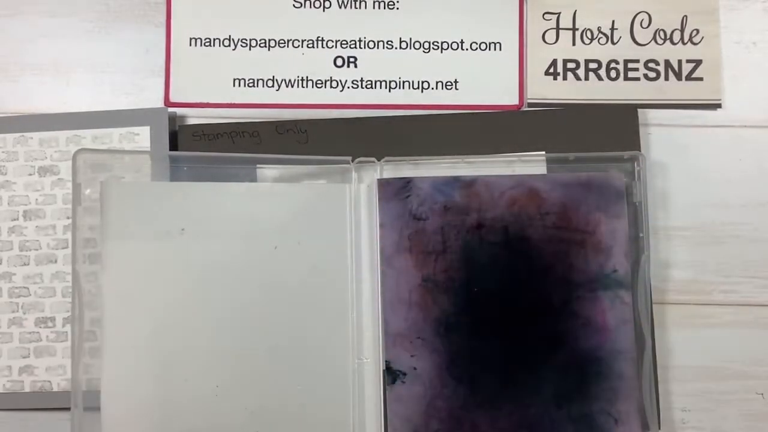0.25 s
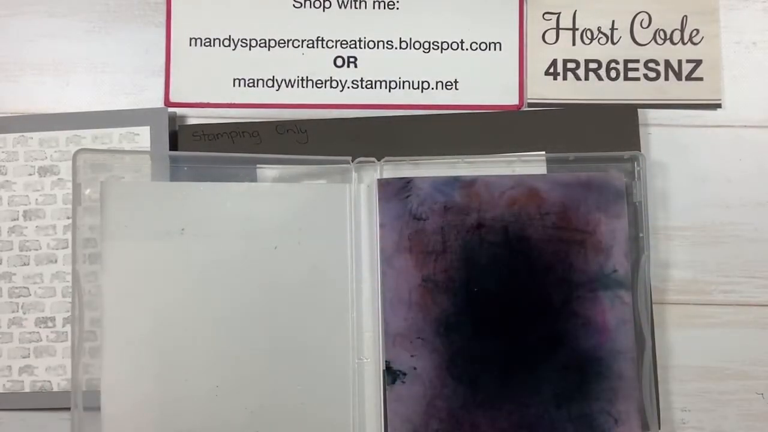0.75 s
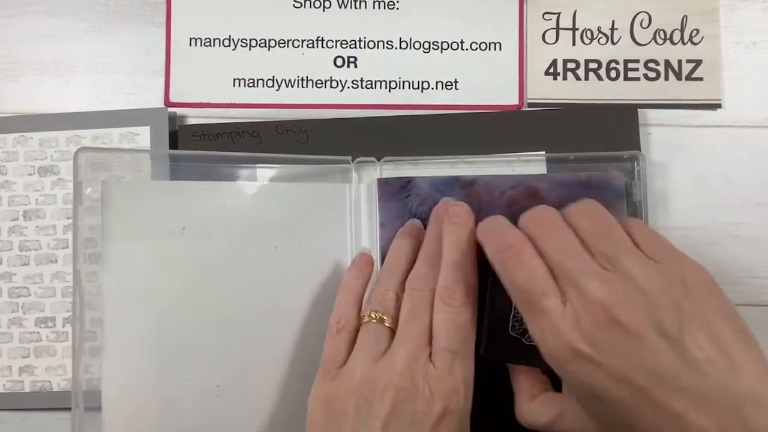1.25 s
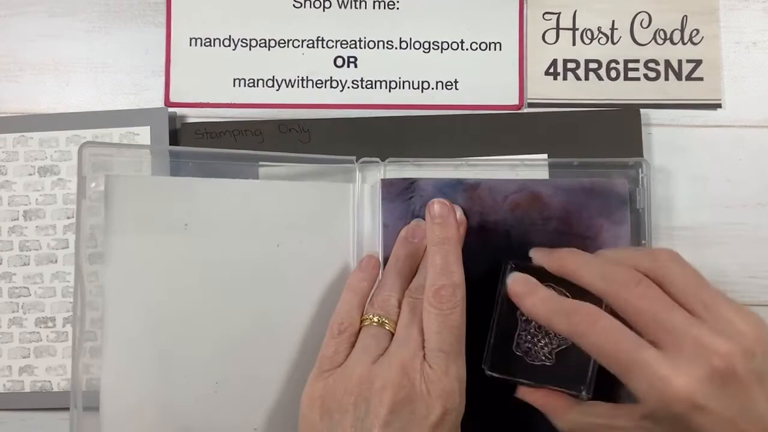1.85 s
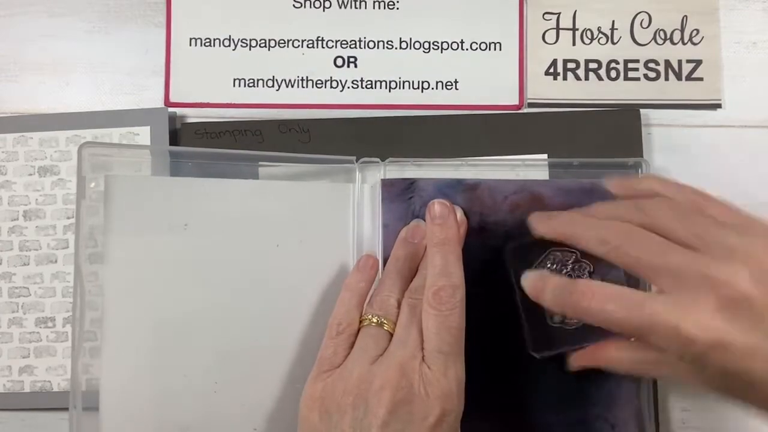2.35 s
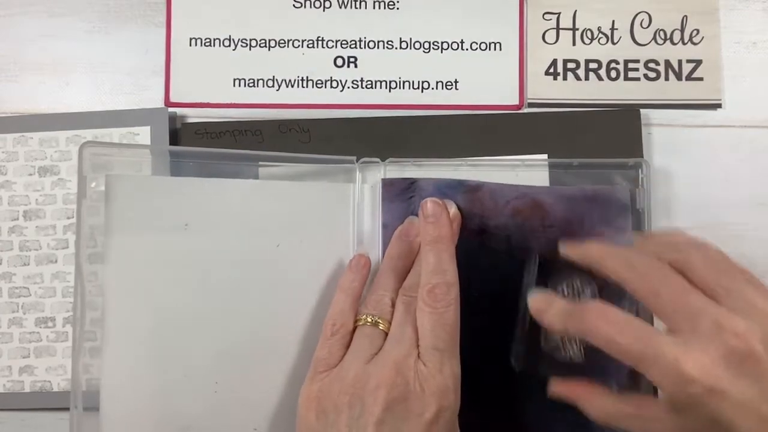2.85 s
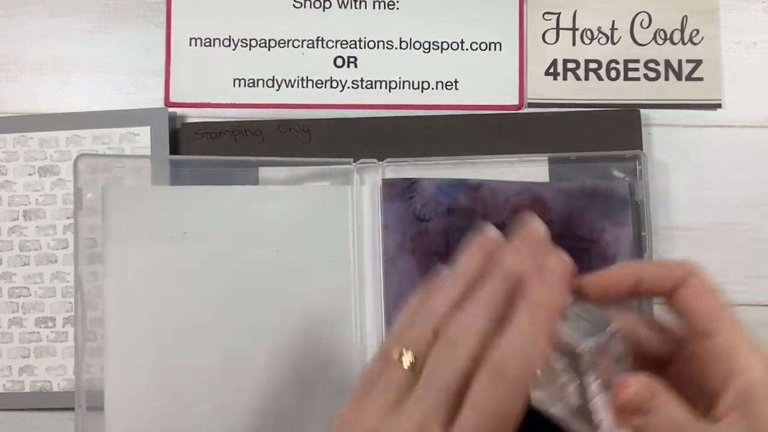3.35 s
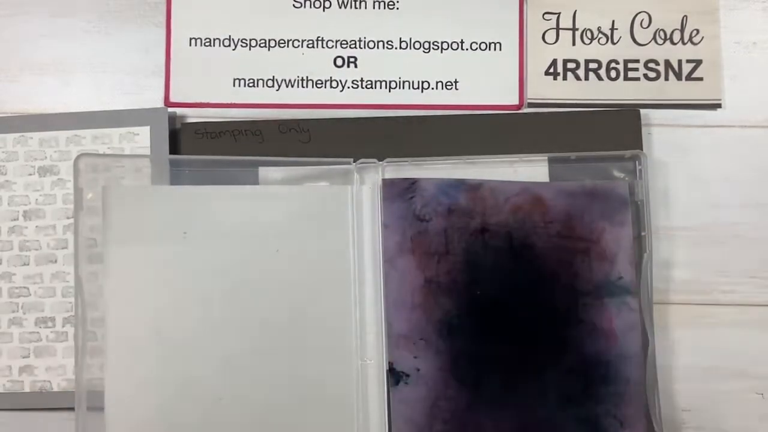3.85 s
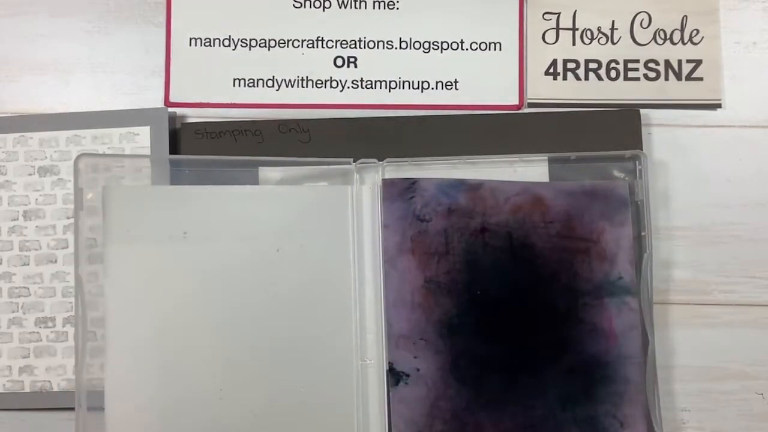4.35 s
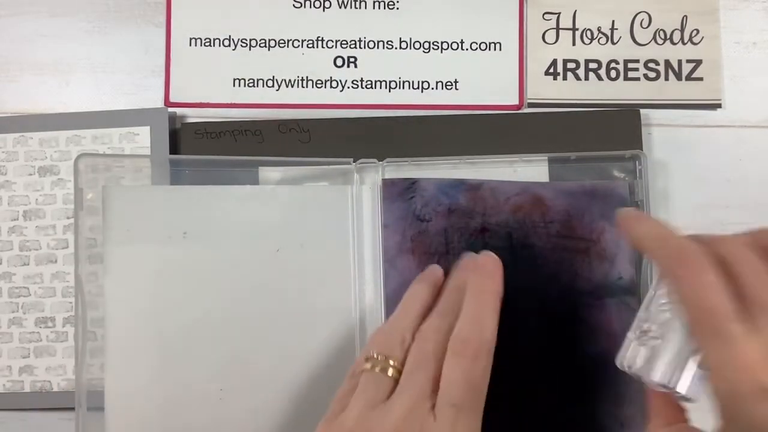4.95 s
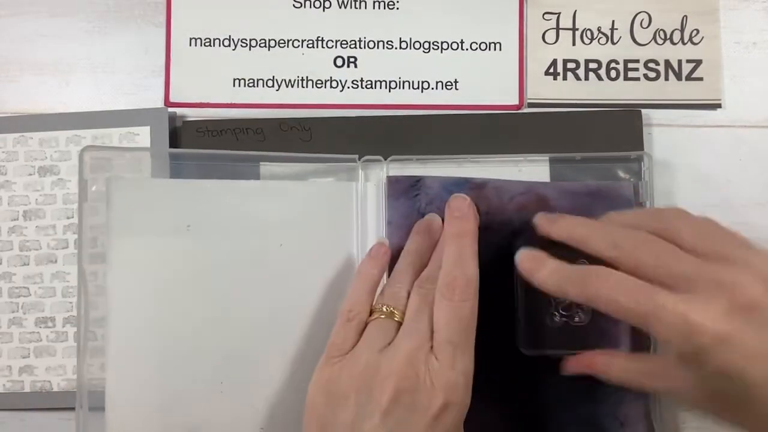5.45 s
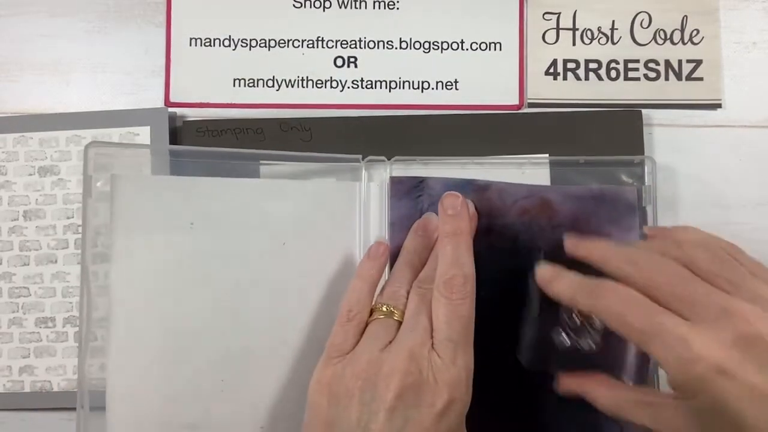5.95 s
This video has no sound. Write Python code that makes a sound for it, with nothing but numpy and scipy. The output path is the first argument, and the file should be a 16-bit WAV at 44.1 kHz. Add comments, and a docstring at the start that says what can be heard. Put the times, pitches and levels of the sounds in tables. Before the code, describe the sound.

In a small, faintly humming room, a nearby microphone picks up a hard plastic block knocking on a desk and settling flat. Soft, tacky squeaks and peeling sounds follow as a stamp is pressed repeatedly on an ink pad, with fingernail ticks and muffled creaking. After a low nudge of the case, a louder run of clacks ends in a thud, and more quiet, sticky dabs follow.

```python
"""A clear acrylic stamp block clacks edge-on onto a desk, drags and thuds flat; small quiet room, low hum.
From 0.9 s something creaks dully in slowing runs as the hands come and go.
From 1.4 s a block is dabbed on an ink pad: the tacky stamp squeaks by stick-slip and peels off with
sticky smacks; at 3 s the pad's case is nudged. At 4 s a block clacks down, shudders and drops flat.
From 5.3 s the dabbing resumes. Light ticks of nails and plastic and faint fizzy crackles fall between."""
import sys
import numpy as np
from scipy import signal
from scipy.fft import rfft, irfft
from scipy.io import wavfile
from scipy.ndimage import map_coordinates

SR = 44100
rng = np.random.default_rng(int(sys.argv[2]) if len(sys.argv) > 2 else 0)


def inscribe(sig):
    """Save sig as 16-bit PCM at rate SR to the path in sys.argv[1].

    A 1-D sig is mono; a 2-D sig holds one channel per row.
    Samples are clipped to [-1, 1] before scaling.
    """
    pcm = np.round(np.clip(np.atleast_2d(sig).T, -1, 1) * 32767)
    wavfile.write(sys.argv[1], SR, pcm.astype(np.int16))


N = 273111
AGE_S = np.arange(SR * 3 // 5) / SR   # time since event onset

# stamp resonances: (centre [Hz], width [Hz], lift [dB])
STAMP_RESONANCES = [(1136, 300, 5), (1660, 1100, 2.5), (2730, 350, 5), (3160, 510, 5.5), (4720, 530, 8)]
# spectrum of the tacky contact: (frequency [Hz], density [dB])
TACK_SPECTRUM = [(200, 9), (600, 14), (1200, 2.5), (2200, -3), (4000, -10), (5500, -19.5), (8000, -21),
                 (15000, -44)]


def from_db(db):
    """Decibels to gain."""
    return 10 ** (np.asarray(db) / 20)


def unit_rms(x):
    """Scale to rms 1."""
    return x / np.sqrt(np.mean(x ** 2) + 1e-20)


def at_hz(points, hz):
    """Interpolate a table over log frequency."""
    table_hz, value = np.transpose(points)
    return np.interp(np.log(np.maximum(hz, 1)), np.log(table_hz), value)


def decay(t60_s, age_s=AGE_S):
    """Envelope falling 60 dB in t60_s."""
    return np.exp(-np.log(1000) * age_s / t60_s)


def rise(build_s, age_s=AGE_S):
    """Exponential onset."""
    return 1 - np.exp(-age_s / build_s)


def swell(half_s, squareness):
    """Time from the peak and a bell envelope; higher squareness gives steeper flanks."""
    t = AGE_S[:12288] - AGE_S[:12288].mean()
    return t, np.exp(-np.abs(t / half_s) ** squareness)


def add(track, time_s, sound):
    """Mix a sound in at time_s."""
    at = int(round(time_s * SR))
    first, last = max(at, 0), min(at + len(sound), len(track))
    track[first:last] += sound[first - at:last - at]


def butter(x, hz, kind, order=2):
    """Causal Butterworth filter."""
    sos = signal.butter(order, np.clip(hz, 10, .45 * SR), kind, fs=SR, output="sos")
    return signal.sosfilt(sos, x + 1e-18)


def noise(spectrum, size, resonances=()):
    """Shaped noise with resonant peaks, rms 1."""
    hz = np.arange(size // 2 + 1) * SR / size
    peaks_db = sum(db / (1 + (2 * (hz - centre) / width) ** 2) for centre, width, db in resonances)
    gain = from_db(at_hz(spectrum, hz) + peaks_db)
    return unit_rms(irfft(rfft(rng.standard_normal(size)) * gain, size))


def drift(rate_hz, size, knots=4096):
    """Smooth random curve, spread about 1."""
    steps = np.arange(size) * rate_hz / SR
    return np.interp(steps, np.arange(knots), rng.standard_normal(knots))


def ring(modes, spread_db, size=len(AGE_S)):
    """Struck modes; each blow shares its force among them differently."""
    t = AGE_S[:size]
    out = np.zeros(size)
    for k, (hz, db, t60_s) in enumerate(modes):
        gain = (-1) ** k * from_db(db + spread_db * rng.standard_normal())
        out += gain * np.sin(2 * np.pi * hz * t) * decay(t60_s, t)
    return out


def dense_ring(spectrum, envelope, size):
    """Close modes as third-octave noise bands, each with its own envelope; energy 1."""
    centres_hz = 63 * 2 ** (np.arange(25)[:, None] / 3)
    hz = np.maximum(np.arange(size // 2 + 1) * SR / size, 1)
    shares = np.maximum(1 - 3 * np.abs(np.log2(hz / centres_hz)), 0)
    bands = irfft(rfft(rng.standard_normal(size)) * shares, size) * envelope(centres_hz, AGE_S[:size])
    energies = np.sum(bands ** 2, axis=1, keepdims=True)
    gains = np.sqrt(centres_hz / energies) * from_db(at_hz(spectrum, centres_hz))
    out = np.sum(bands * gains, axis=0)
    return out / np.sqrt(np.sum(out ** 2))


def rasp(half_s, hz, spectrum, band_ratio, squareness, grain_db=2, resonances=(), glide_oct=0):
    """Clumped tiny snaps in a broad band: start offset from the peak [s], sound (rms 1 at the peak)."""
    t, envelope = swell(half_s, squareness)
    read_position = np.cumsum(2 ** (glide_oct * np.clip(t / half_s, -2, 2)))
    gliding = map_coordinates(noise(spectrum, len(t), resonances), [read_position], mode="wrap")
    snaps = gliding * from_db(grain_db * drift(800, len(t)))
    sound = envelope * butter(snaps, [hz / band_ratio, hz * band_ratio], "band", order=3)
    return t[0], sound * np.sqrt(np.sum(envelope ** 2) / np.sum(sound ** 2))


def background(air_db=-62, waver_db=5, wander_hz=4.6):
    """Dull room air and a wavering hum."""
    # room air: (frequency [Hz], density [dB])
    air_spectrum = [(20, -26.5), (40, -3), (62, -3), (90, -2), (130, -3.5), (180, -12.5), (270, -10.5),
                    (450, -14.5), (650, -22), (1000, -30), (2000, -38.5), (5000, -42.5), (13000, -49),
                    (15500, -56)]
    # hum partials: (frequency [Hz], level [dB])
    partials = [(64.6, -70), (129.2, -69), (344.5, -77.5), (441.4, -78.5)]
    out = from_db(air_db) * noise(air_spectrum, N)
    for hz, db in partials:
        phase = 2 * np.pi * np.cumsum(hz + wander_hz * drift(6.5, N)) / SR
        out += from_db(db + waver_db * drift(12, N)) * np.sqrt(2) * np.sin(phase)
    return out


def rubs(drag_peak_s=.19, drag_db=-46.5, ring_peak_s=.245):
    """Skin and block hiss over plastic or paper; an edge dragged on the desk scrapes and rings."""
    # brushing strokes: (peak time [s], level [dB], half length [s])
    strokes = [(0.036, -73, 0.1), (0.238, -68.5, 0.085), (2.215, -67.5, 0.0058), (3.09, -54.5, 0.026),
               (3.256, -63, 0.036), (4.565, -53, 0.011), (5.407, -63.5, 0.017), (5.467, -69, 0.023),
               (5.871, -61.5, 0.016)]
    # friction noise: (frequency [Hz], density [dB])
    spectrum = [(200, 7), (600, 14), (1200, 0.5), (3200, -7.5), (5000, -10), (8000, -16.5), (15000, -40)]
    # ringing of the dragged block: (frequency [Hz], level [dB])
    drag_rings = [(750, -60), (4650, -73)]
    out = np.zeros(N)
    for peak_s, db, half_s in strokes:
        offset_s, hiss = rasp(half_s, 5500, spectrum, band_ratio=4, squareness=1.9)
        add(out, peak_s + offset_s, from_db(db) * hiss)
    offset_s, scrape = rasp(.11, 575, spectrum, band_ratio=3.2, squareness=3, grain_db=.5)
    add(out, drag_peak_s + offset_s, from_db(drag_db) * scrape)
    t, envelope = swell(half_s=.055, squareness=3.8)
    for hz, db in drag_rings:
        ringing = butter(rng.standard_normal(len(t)), [hz - 80, hz + 80], "band")
        add(out, ring_peak_s + t[0], from_db(db) * envelope * unit_rms(ringing))
    return out


def block_impact(build_cycles=2.1, crack_s=.0014, size=4096):
    """Struck acrylic: crack and treble come first, the lows build more slowly and last longer."""
    # block modes: (frequency [Hz], level [dB], t60 [s])
    modes = [(590, -1.5, 0.05), (993, -11, 0.07), (1234, -8, 0.23), (1486, -4.5, 0.073), (1656, -11, 0.11),
             (1962, -6.5, 0.056), (2444, -7, 0.054), (2760, -8, 0.04), (3010, -10.5, 0.057),
             (3305, -9.5, 0.1), (3680, -9.5, 0.032), (4080, -13.5, 0.019), (7060, -27.5, 0.027)]
    # dense ringing: (frequency [Hz], density [dB])
    spectrum = [(100, -9.5), (300, -2), (500, 0.5), (800, -2), (1300, -2), (2200, -4.5), (3300, -9.5),
                (4200, -14.5), (5200, -19.5), (7000, -24), (10000, -40), (15000, -40)]

    def envelope(hz, age_s):
        build_s = np.minimum(build_cycles / hz, .0012)
        return rise(build_s, age_s) * decay(.027 * (1500 / hz) ** .28, age_s)
    dense = from_db(22.5) * dense_ring(spectrum, envelope, size)
    snap = rng.standard_normal(size) * np.exp(-(AGE_S[:size] / crack_s) ** 2)
    crack = butter(snap, [3200, 6400], "band")
    tones = from_db(-8.5) * ring(modes, spread_db=2, size=size)
    return dense + tones + from_db(-6) * crack / np.abs(crack).max()


def desk_boom():
    """The desk top takes up a blow and booms briefly."""
    # desk modes: (frequency [Hz], level [dB], t60 [s])
    modes = [(126, -2.5, 0.14), (155, -9.5, 0.13), (200, -14, 0.13), (263, -3, 0.078), (327, -7, 0.15),
             (367.4, -16.5, 0.099), (429, -13.5, 0.49), (513, -11.5, 0.09), (625.7, -10, 0.098)]
    return ring(modes, spread_db=3.5) * rise(.005)


def clacks():
    """A block's edge hits desk or case; each clack has its own brightness, bass cut and desk boom."""
    # edge contacts: (time [s], level [dB], low-pass [Hz], high-pass [Hz], desk boom re level [dB])
    contacts = [(0.0704, -22.5, 2280, 266, -10.5), (0.0789, -31.5, 1410, 302, -9),
                (0.0901, -21, 5530, 342, -13.5), (3.0133, -45, 9500, 450, 0.5),
                (4.013, -31.5, 7570, 340, 1), (4.0632, -40.5, 5500, 596, -1.5),
                (4.1792, -15.5, 4300, 1200, -19), (4.1807, -17.5, 2200, 750, -15),
                (4.196, -16.5, 8900, 1660, -18), (4.2009, -20, 1800, 380, -14.5),
                (6.0941, -48, 2320, 502, -6)]
    out, boom = np.zeros(N), desk_boom()
    for time_s, db, top_hz, bottom_hz, desk_db in contacts:
        impact = butter(block_impact(), top_hz, "low")
        add(out, time_s, from_db(db) * butter(impact, bottom_hz, "high"))
        add(out, time_s, from_db(db + desk_db) * boom)
    return out


def ticks(top_hz=12200):
    """Nails and plastic tap too lightly to move the desk."""
    # taps: (time [s], level [dB], high-pass [Hz])
    taps = [(0.186, -43.5, 3020), (0.266, -52, 3000), (0.44, -50.5, 1192), (0.667, -70, 900),
            (1.475, -34.5, 2070), (2.51, -63, 1285), (2.638, -54, 4940), (3.026, -43, 3130),
            (3.582, -55.5, 6020), (3.597, -51.5, 6000), (4.555, -54.5, 1423), (4.924, -71, 900),
            (4.941, -55.5, 4000), (5.583, -46, 1210), (5.957, -53, 4030), (6.125, -49.5, 2920)]
    out = np.zeros(N)
    for time_s, db, bottom_hz in taps:
        impact = butter(block_impact(), top_hz, "low", order=1)
        add(out, time_s, from_db(db) * butter(impact, bottom_hz, "high"))
    return out


def thuds(slap_hz=600, slap_delay_s=.00141, slap_half_s=.0014):
    """The block's soft face cushions the landing: a short slap, then a boom without treble."""
    # flat landings: (time [s], level [dB], low-pass [Hz], desk boom re level [dB])
    landings = [(0.3391, -22.5, 876, -0.5), (0.441, -40.5, 814, -6), (4.3159, -24.5, 1130, -2.5)]
    out, t = np.zeros(N), AGE_S - slap_delay_s
    pulse = np.sin(2 * np.pi * slap_hz * t) * np.exp(-(t / slap_half_s) ** 2)
    slap = butter(pulse, 1700, "low", order=5)
    for time_s, db, top_hz, desk_db in landings:
        add(out, time_s, from_db(db + 5.5) * slap)
        add(out, time_s, from_db(db + 2) * butter(block_impact(), top_hz, "low", order=4))
        add(out, time_s, from_db(db + desk_db) * desk_boom())
    return out


def creaks(gap_ratio=1.235, fade_db_per_s=8, band_hz=(370, 780), size=4096):
    """Muffled slips in slowing, fading runs; each slip has a weaker, longer rebound."""
    # runs of slips: (start [s], length [s], first gap [s], level [dB])
    runs = [(0.876, .09, .064, -55), (1.238, .03, .06, -55), (1.89, .03, .06, -53),
            (2.553, .03, .06, -54.5), (3.556, .38, .0405, -52.5), (3.94, .03, .06, -57),
            (4.779, .18, .038, -53.5), (5.611, .03, .06, -53)]
    out = np.zeros(N)
    for start_s, length_s, first_gap_s, db in runs:
        ages_s = first_gap_s * (gap_ratio ** np.arange(8) - 1) / (gap_ratio - 1)
        for age_s in ages_s[ages_s < length_s]:
            for delay_s, lift_db, t60_s in ((0, 4, .04), (.016, 0, .13)):   # slip, rebound
                push = rng.standard_normal(size) * decay(t60_s, AGE_S[:size])
                slip = butter(push, band_hz, "band", order=3)
                gain = from_db(db + lift_db - fade_db_per_s * age_s)
                add(out, start_s + age_s + delay_s, gain * slip / np.abs(slip).max())
    return out


def crackles():
    """Faint, very high, fizzy crackles."""
    # bursts: (peak time [s], level [dB], half length [s])
    bursts = [(1.008, -73, .006), (1.042, -75, .01), (1.141, -77.5, .008), (2.211, -71, 0.009),
              (3.088, -76, 0.016), (3.25, -75, 0.026), (4.817, -61.5, 0.0045), (4.83, -70, 0.0086),
              (4.851, -67, .005)]
    # crackle noise: (frequency [Hz], density [dB])
    spectrum = [(5000, 5), (9000, -17), (12000, -6), (15000, -2)]
    out = np.zeros(N)
    for peak_s, db, half_s in bursts:
        offset_s, fizz = rasp(half_s, 12400, spectrum, band_ratio=1.68, squareness=1, grain_db=5)
        add(out, peak_s + offset_s, from_db(db) * fizz)
    return out


def peels_and_washes(detune_oct=.07, glide_oct=.1):
    """Sticky smacks of the stamp leaving the pad, resonances bending; plus two soft reverberant washes."""
    # bursts: (peak time [s], level [dB], half length [s], centre [Hz])
    # those at 1.523 s and 2.214 s are the washes, after a tick and a squeak
    bursts = [(1.45, -65.5, 0.017, 3800), (1.523, -57.5, 0.036, 2580), (1.633, -52, 0.01, 2900),
              (1.654, -51, 0.013, 2580), (1.745, -57, 0.013, 1470), (1.767, -56, 0.014, 1960),
              (1.863, -52.5, 0.0099, 2250), (1.973, -58, 0.02, 2220), (2.16, -60.5, 0.011, 1940),
              (2.214, -61, 0.048, 1240), (2.419, -50.5, 0.02, 1560), (2.525, -61.5, 0.0124, 2260),
              (2.834, -60.5, 0.0078, 1980), (2.864, -49.5, 0.013, 2970), (2.898, -51, 0.0179, 2350),
              (3.101, -60, 0.01, 2900), (3.123, -52.5, 0.0225, 2390), (3.281, -64.5, 0.013, 1720),
              (5.34, -68, 0.036, 1850), (5.711, -52.5, 0.0014, 1380), (5.895, -54, 0.023, 2330),
              (5.995, -67, 0.019, 1800), (6.139, -56.5, 0.028, 2280)]
    out = np.zeros(N)
    for (peak_s, db, half_s, hz), (shift, bend) in zip(bursts, rng.uniform(-.71, 1, (len(bursts), 2))):
        detune = 2 ** (detune_oct * shift)
        resonances = [(centre * detune, width, lift) for centre, width, lift in STAMP_RESONANCES]
        offset_s, burst = rasp(half_s, hz, TACK_SPECTRUM, band_ratio=2.04, squareness=2.6,
                               resonances=resonances, glide_oct=glide_oct * bend)
        add(out, peak_s + offset_s, from_db(db) * burst)
    return out


def squeaks(arch_oct=.044, wobble=.045):
    """Stick-slip on the pad gives a bending tone; a stronger slip every few cycles adds sidebands."""
    # slides: (peak time [s], level [dB], half length [s], pitch [Hz], glide [oct per half length],
    # overtones re level [dB], group size [slips], sidebands re level [dB], rasp re level [dB])
    slides = [(1.6266, -48, 0.0012, 1800, .15, -16, 2, -8, -11),
              (1.634, -50.5, .005, 3330, 0.12, -35, 3, -18, -16),
              (1.642, -54, 0.0025, 1180, -0.1, -3, 2, -22, -14),
              (2.16, -48, 0.0069, 1346, -0.075, -37, 3, -6, -7),
              (2.394, -52, 0.016, 1334, 0.025, -24.5, 2, -10, -12),
              (2.404, -45, 0.004, 1246, 0.037, -23, 4, -8.5, -14),
              (2.417, -62, 0.0067, 860, -.06, 8, 2, -2, 0),
              (2.6197, -42, 0.014, 1243, -0.063, -27, 3, -13, -9.5),
              (2.87, -44, 0.013, 1531, 0.038, -14.5, 3, -26, -12),
              (3.019, -55, 0.01, 1338, -.1, -22, 2, -19, 3.5),
              (5.536, -66.5, 0.0142, 1209, 0.12, -22, 3, 1, 3),
              (5.688, -57.5, 0.021, 1315, -.12, -29, 3, -8, 1),
              (5.775, -66, 0.002, 3550, -0.022, -22, 4, -14, -10),
              (5.801, -60, 0.0028, 3500, -0.016, -32, 4, -15, -2),
              (5.859, -46, 0.01, 1194, -0.15, -22, 4, -7, 0.5),
              (5.887, -59, 0.0033, 2870, -0.033, -24, 2, -7, -12)]
    # overtones: (multiple of pitch, level [dB])
    harmonics = [(2, 0), (3, -5), (4, -13)]
    out = np.zeros(N)
    for peak_s, db, half_s, hz, glide_oct, overtone_db, group, sideband_db, rasp_db in slides:
        t, envelope = swell(half_s, squareness=3.4)   # abrupt grip and release
        progress = np.clip(t / half_s, -2, 2)
        bend_oct = glide_oct * progress - arch_oct * progress ** 2   # pitch arches with pressure
        slip_hz = hz * 2 ** bend_oct * (1 + wobble * drift(900, len(t), knots=8192))
        phase = 2 * np.pi * np.cumsum(slip_hz) / SR
        overtones = sum(from_db(level_db) * np.sin(k * phase) for k, level_db in harmonics)
        sidebands = np.sin(phase - phase / group) + from_db(-4) * np.sin(phase + phase / group)
        tone = np.sin(phase) + from_db(overtone_db) * overtones + from_db(sideband_db) * sidebands
        add(out, peak_s + t[0], from_db(db) * envelope * np.sqrt(2) * tone)
        offset_s, grit = rasp(half_s, hz, TACK_SPECTRUM, band_ratio=1.7, squareness=2,
                              resonances=STAMP_RESONANCES)
        add(out, peak_s + offset_s, from_db(db + rasp_db) * grit)
    return out


def case_bumps():
    """A slow, soft push sets the ink pad's case booming on the desk."""
    # nudges: (time [s], level [dB])
    nudges = [(3.02, -35), (3.12, -47), (3.25, -54), (5.322, -61)]
    # case modes: (frequency [Hz], level [dB], t60 [s])
    modes = [(68, 15, 0.07), (113.6, 5, 0.14), (193.5, -10.5, 0.34)]
    out = np.zeros(N)
    for time_s, db in nudges:
        add(out, time_s, from_db(db) * ring(modes, spread_db=-6) * rise(.018))
    return out


def shudders():
    """A block set down askew shudders with a hollow ring."""
    # settling jolts: (time [s], level [dB])
    jolts = [(4.018, -41), (4.066, -35.5)]
    # hollow modes: (frequency [Hz], level [dB], t60 [s])
    modes = [(248, -4.5, 0.15), (305, -7, 0.11), (362, -5.5, 0.11)]
    out = np.zeros(N)
    for time_s, db in jolts:
        add(out, time_s, from_db(db) * ring(modes, spread_db=3.5) * rise(.0054))
    return out


def room(x, t60_scale=1, wet_db=-9.5, build_s=.0033):
    """Wall reflections build up, then decay at a rate set per band."""
    # reflections: (frequency [Hz], density [dB])
    spectrum = [(60, -18), (130, -4), (280, 7), (500, -1.5), (750, -3.5), (1300, 1), (2100, 1.5), (3600, 0),
                (5500, -1), (8000, -3), (15000, -9)]
    # room decay: (frequency [Hz], t60 [s])
    decay_times = [(100, 0.082), (600, 0.22), (1500, 0.42), (3300, .32), (5200, 0.3), (8000, 0.38),
                   (15000, .16)]

    def envelope(hz, age_s):
        onset = 1 - np.exp(-(age_s / build_s) ** 2)
        return onset * decay(t60_scale * at_hz(decay_times, hz), age_s)
    return from_db(wet_db) * signal.fftconvolve(x, dense_ring(spectrum, envelope, size=24576))[:N]


def scene():
    """Handling on the desk, its reflections and the background; mono."""
    dull = thuds() + creaks() + shudders()
    squeaking = squeaks()
    covered = peels_and_washes() + rubs() + case_bumps() + crackles()
    # sounds under the hand die sooner; little of a squeak escapes between stamp and pad
    near = room(from_db(-3) * covered + from_db(-5.5) * squeaking, t60_scale=.55)
    # the block radiates a different mix of modes to each of two walls
    walls = sum(room(clacks() + ticks() + dull) for _ in range(2)) / np.sqrt(2)
    direct = clacks() + ticks() + dull + covered + squeaking
    return (direct + near + walls + background())[None]


def record(dry, low_cut_hz=42, high_cut_hz=15700):
    """The microphone loses the deepest bass; the top is cut steeply."""
    thinned = butter(dry, low_cut_hz, "high", order=3)
    return signal.sosfilt(signal.ellip(10, .1, 80, high_cut_hz, fs=SR, output="sos"), thinned)


dry = scene()
out = record(dry)
inscribe(out)
```